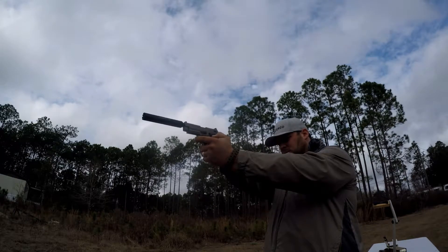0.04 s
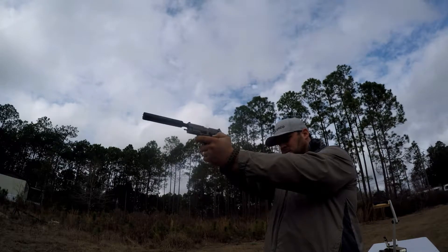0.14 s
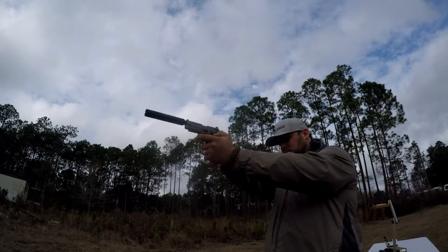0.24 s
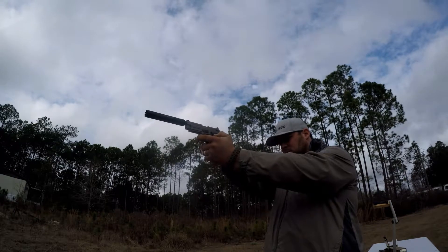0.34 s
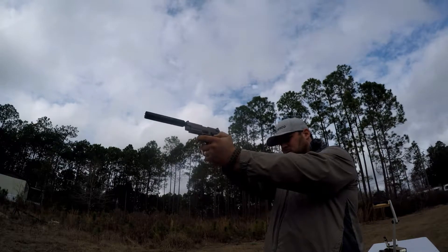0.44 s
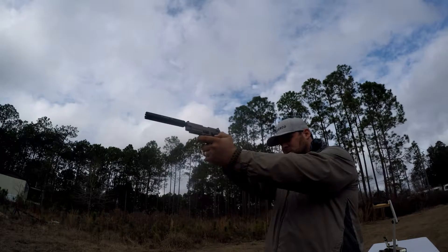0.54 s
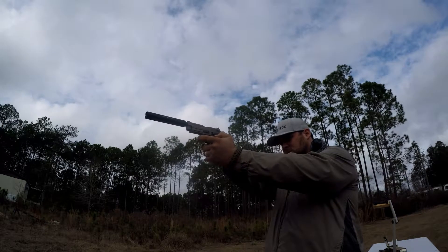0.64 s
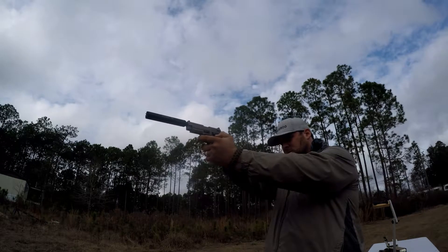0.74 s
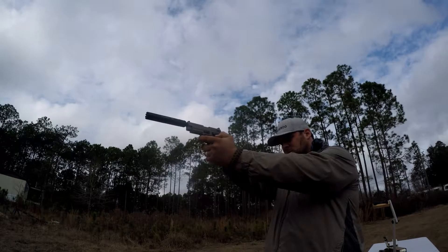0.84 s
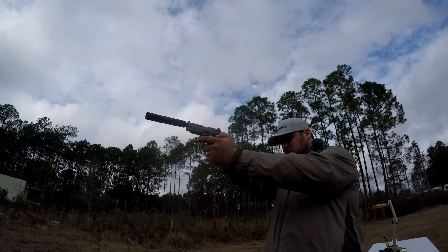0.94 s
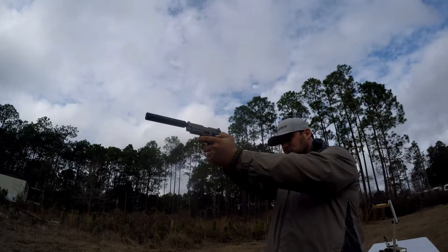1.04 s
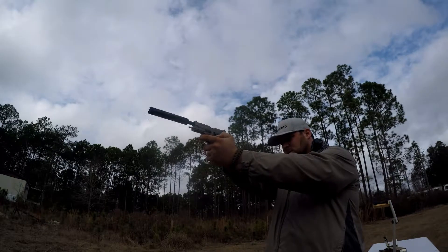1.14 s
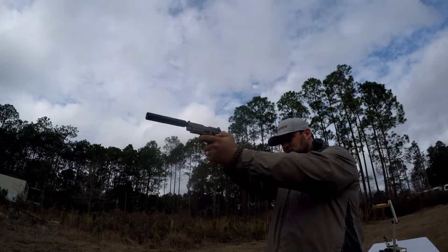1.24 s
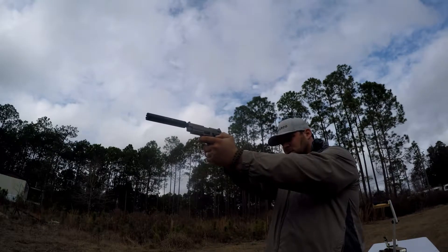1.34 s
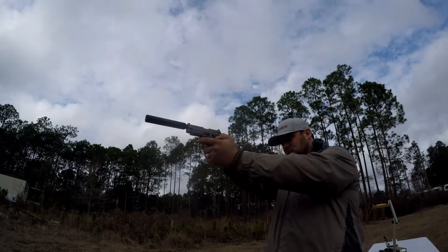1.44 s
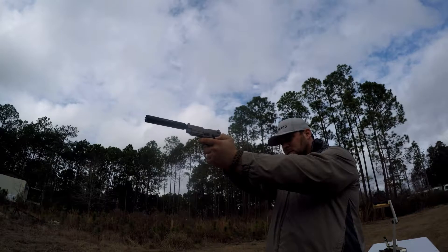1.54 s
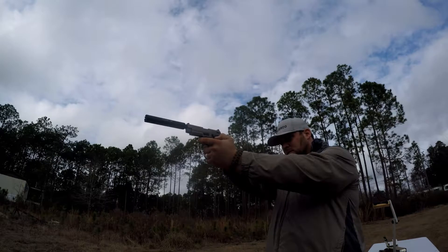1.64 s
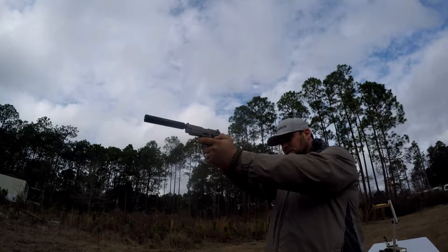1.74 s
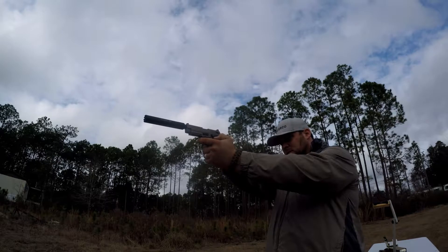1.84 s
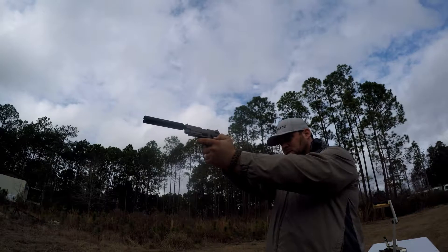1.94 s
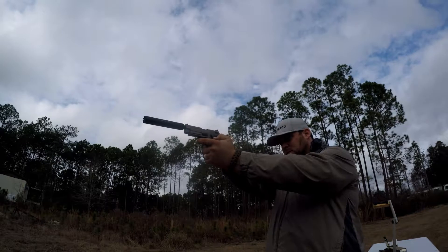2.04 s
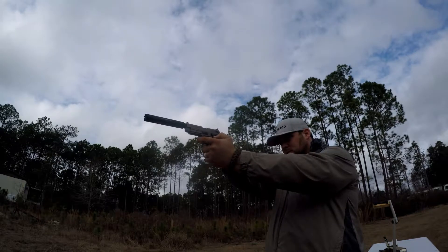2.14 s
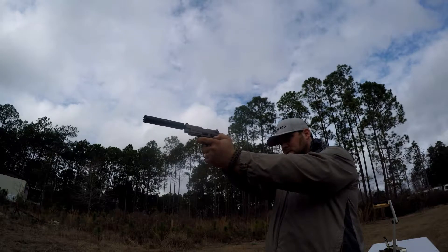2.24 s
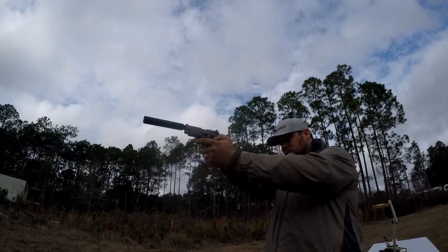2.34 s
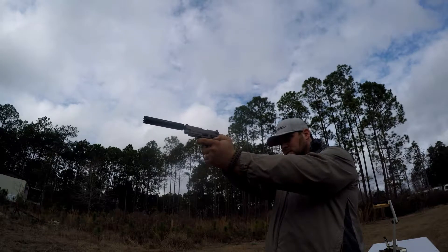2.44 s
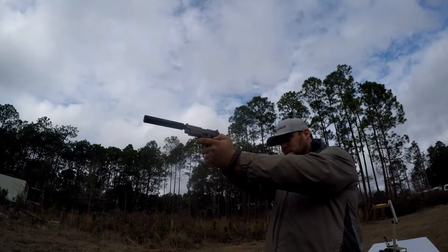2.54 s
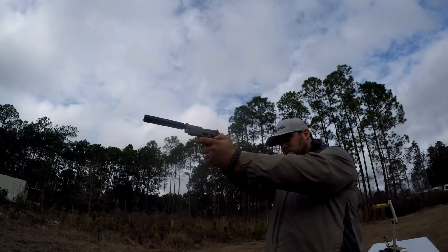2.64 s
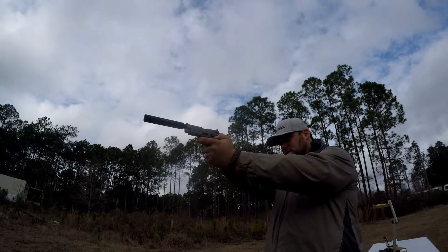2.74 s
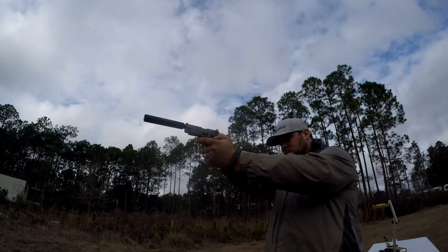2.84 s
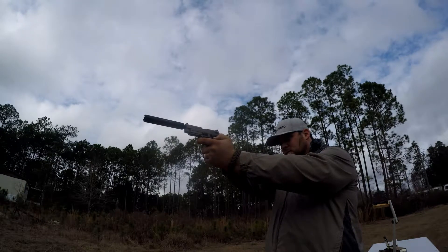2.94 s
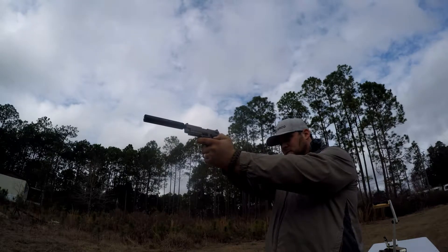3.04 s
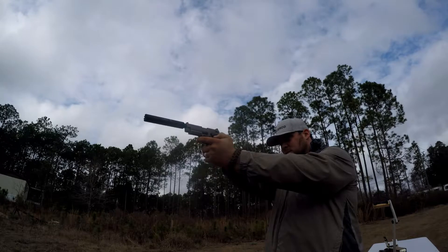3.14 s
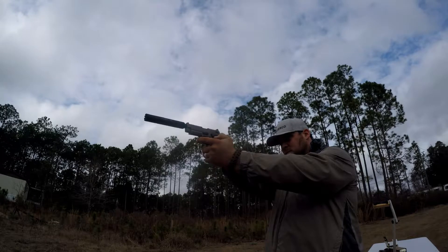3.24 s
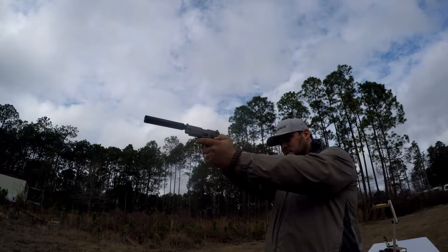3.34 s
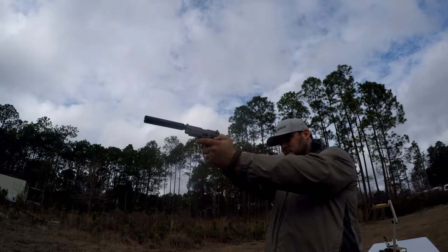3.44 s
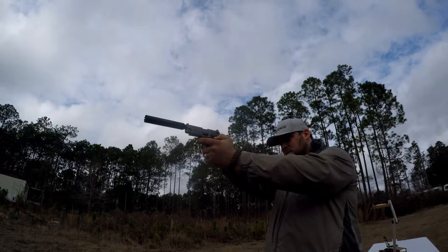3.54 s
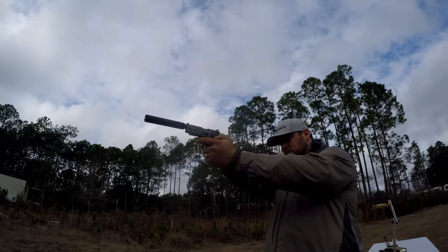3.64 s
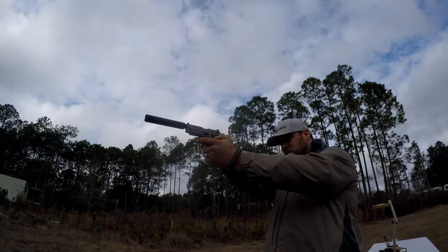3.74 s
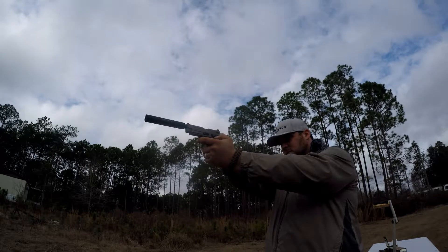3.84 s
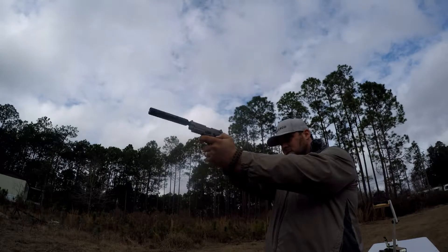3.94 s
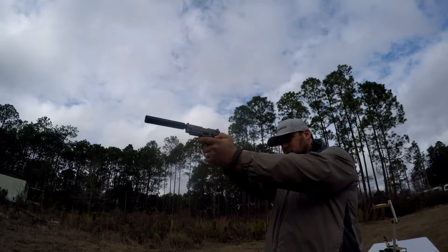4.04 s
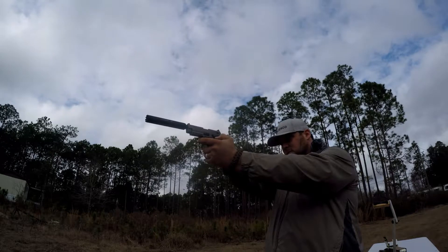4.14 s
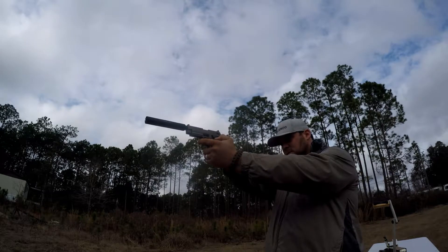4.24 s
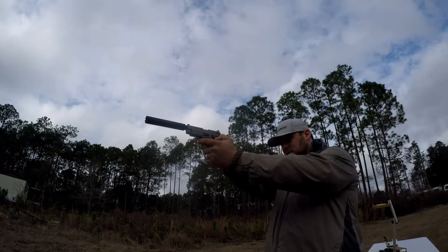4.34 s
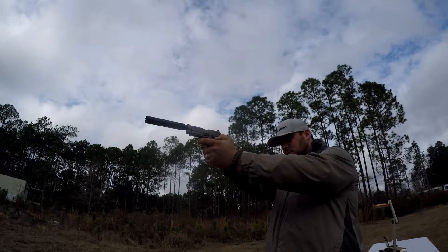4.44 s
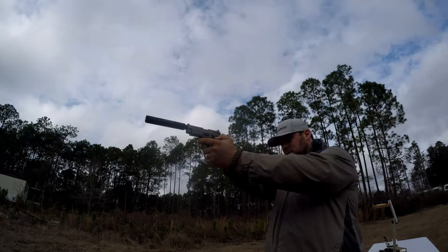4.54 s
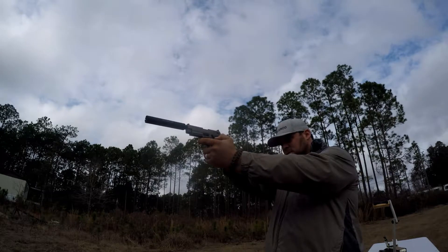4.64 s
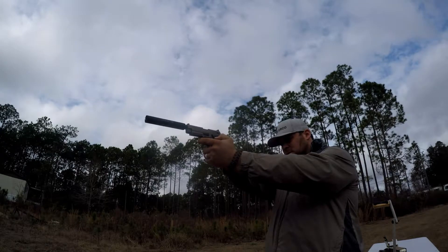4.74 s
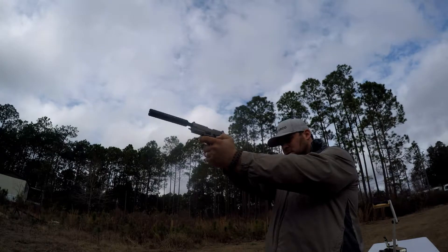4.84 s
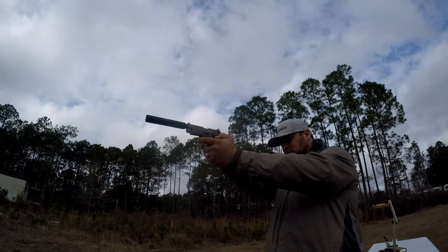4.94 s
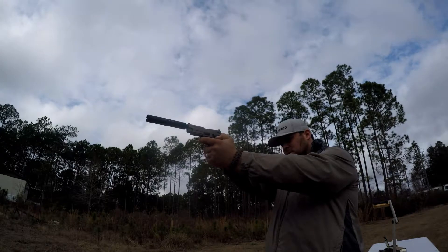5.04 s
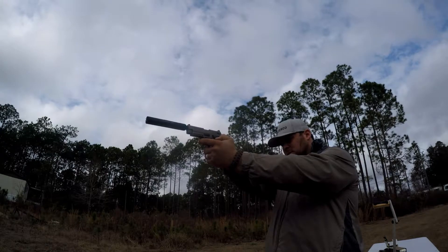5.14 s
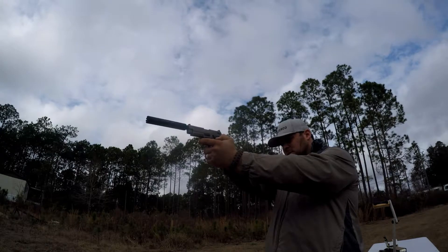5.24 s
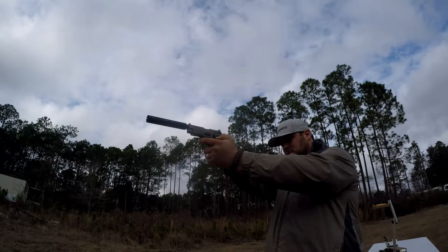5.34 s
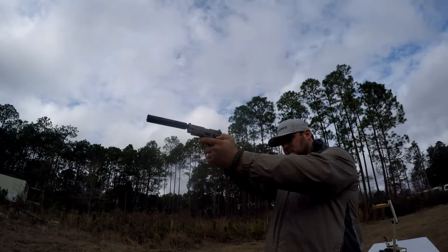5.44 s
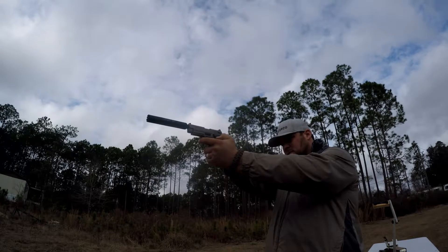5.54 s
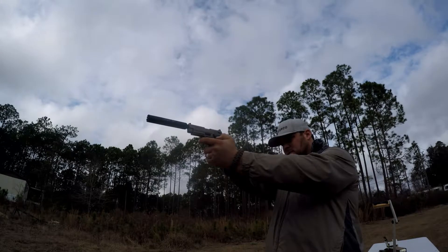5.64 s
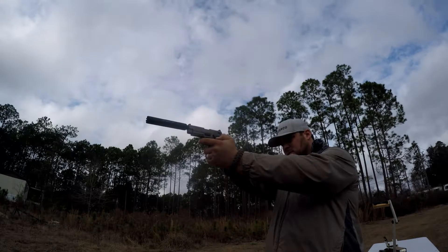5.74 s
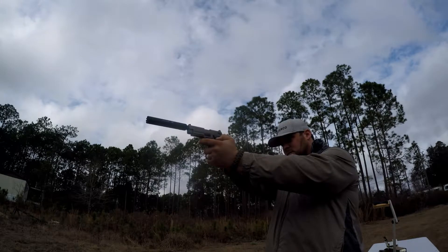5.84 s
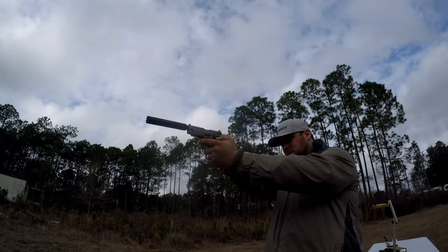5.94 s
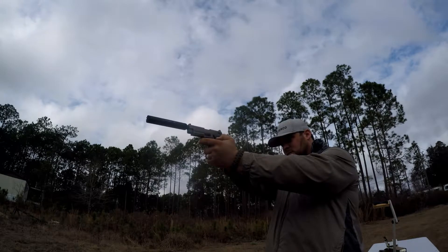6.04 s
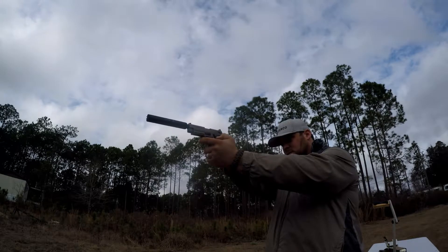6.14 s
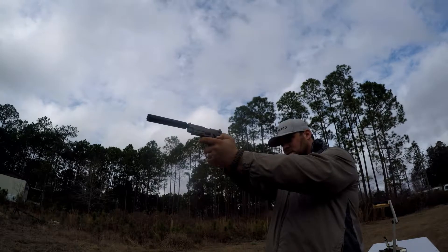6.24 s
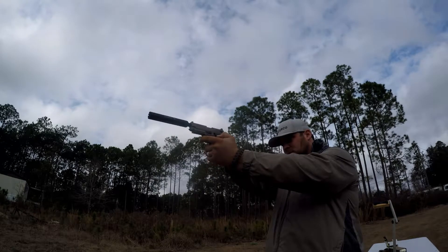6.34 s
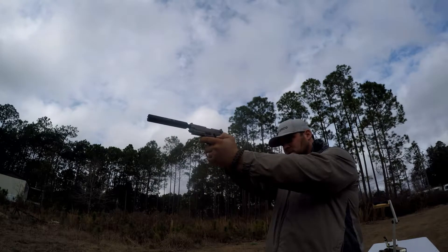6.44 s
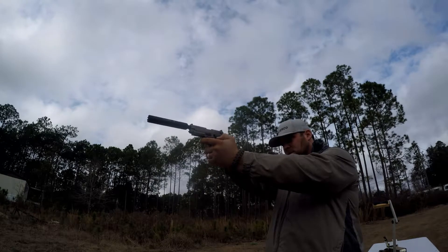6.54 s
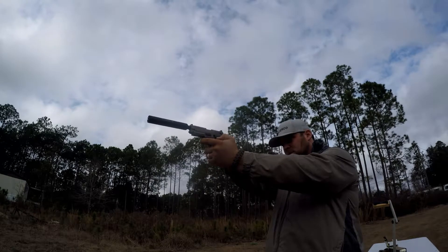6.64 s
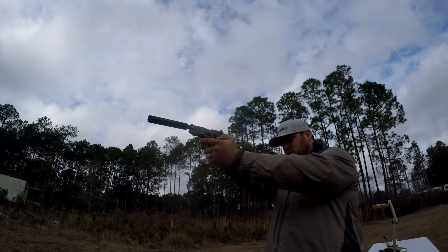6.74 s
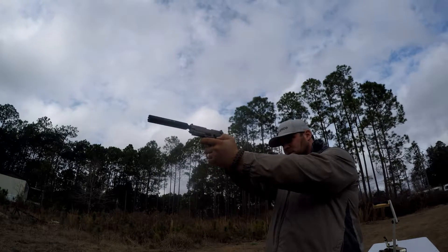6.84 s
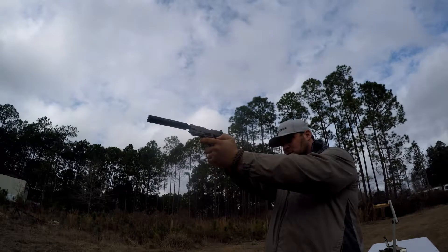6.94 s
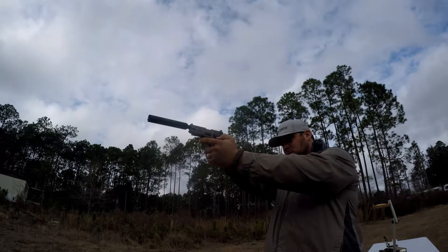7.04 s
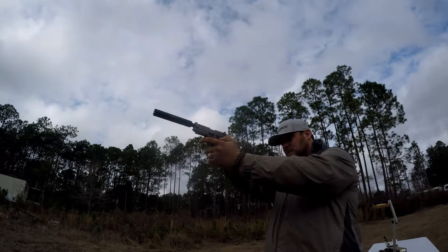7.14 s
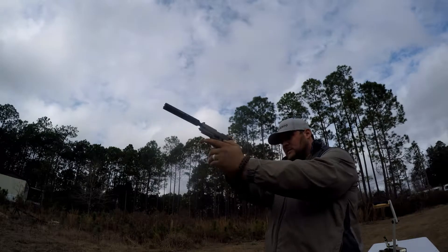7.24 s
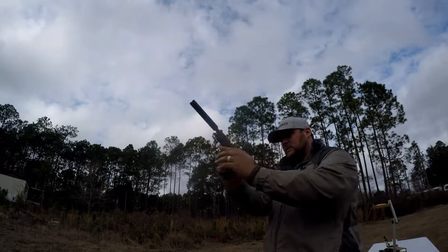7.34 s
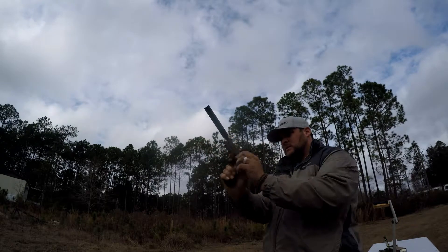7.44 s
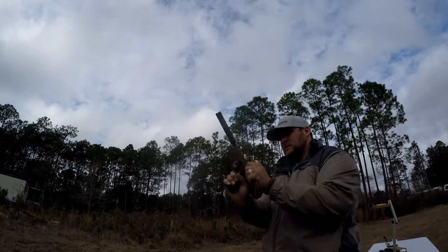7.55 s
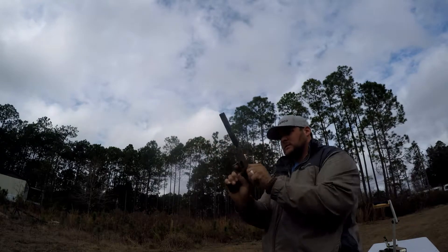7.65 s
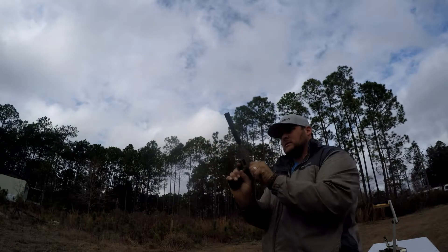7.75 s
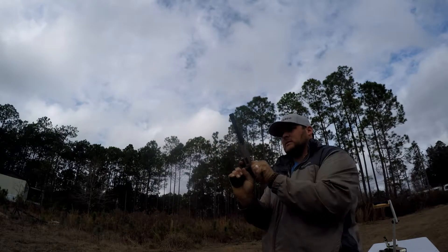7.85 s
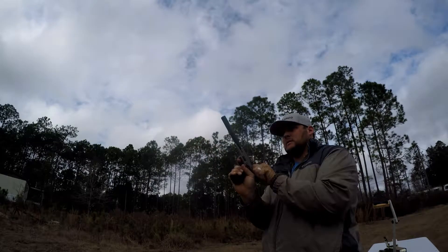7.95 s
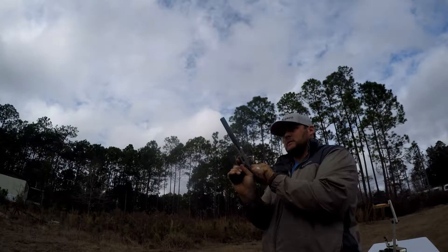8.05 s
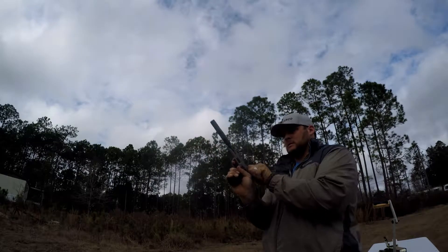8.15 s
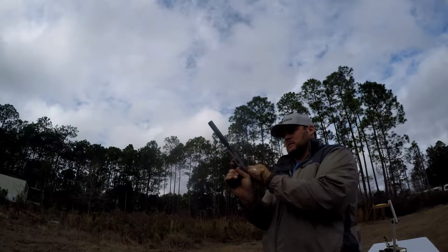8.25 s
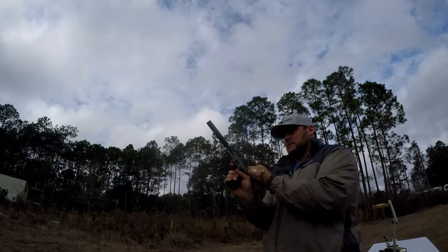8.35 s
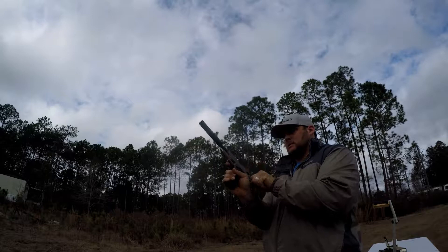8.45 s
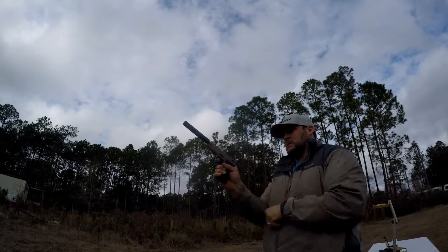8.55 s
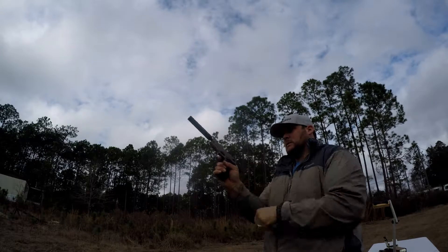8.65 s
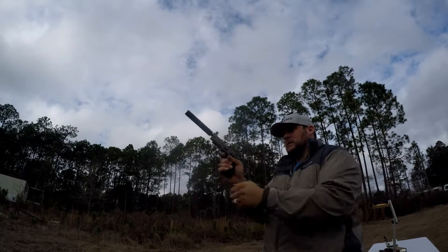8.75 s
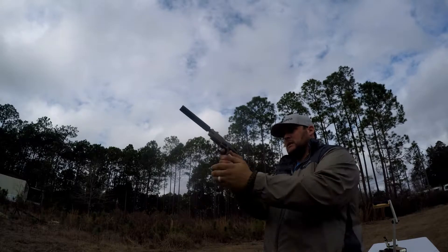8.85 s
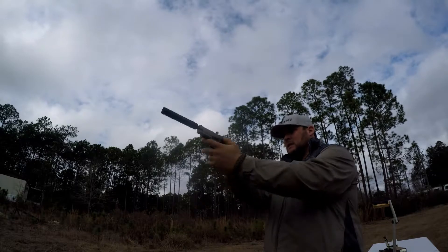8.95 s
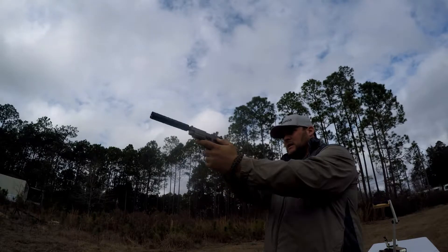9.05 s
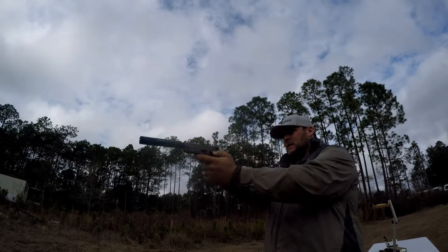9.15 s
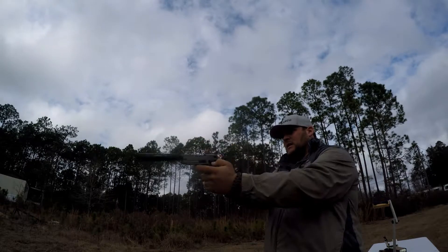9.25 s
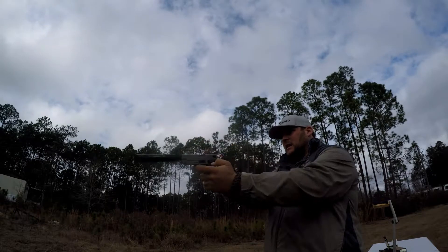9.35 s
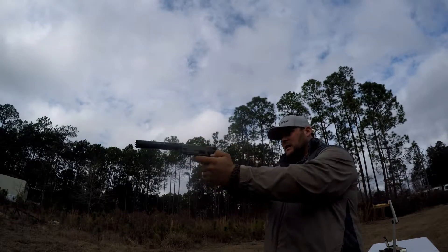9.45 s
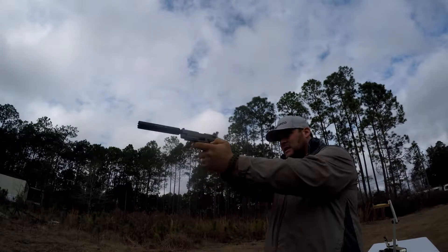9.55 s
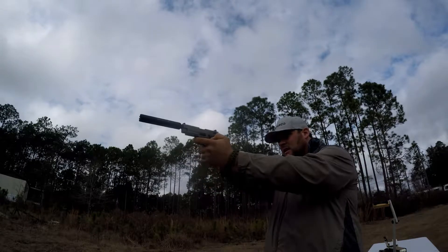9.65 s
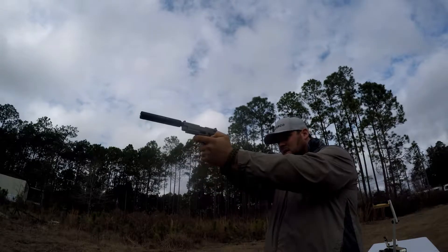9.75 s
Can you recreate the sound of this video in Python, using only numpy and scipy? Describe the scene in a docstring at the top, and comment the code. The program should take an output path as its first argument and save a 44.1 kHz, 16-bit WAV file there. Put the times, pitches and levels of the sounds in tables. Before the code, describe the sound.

Wind rumbles softly on the microphone in an open range beside pines. A suppressed pistol fires seven times, slightly unevenly spaced: blunt, overloading pop, gas hiss, bright steel clatter, then slapping reflections and fading leafy rush. A far bird calls faintly between the first shots and a thin peep comes later. Finally the action is pulled back with a scrape and click, then slammed home, leaving wind.

```python
"""Suppressed pistol at the edge of a pine wood

A small suppressed pistol fires seven times close by; then its bolt is worked by hand.
Each shot sums damped sines (the thump), coloured noise (the gas) and struck modes (the bolt).
Trunks and crowns answer with delayed, fading noise; the loudest peaks overload the input.
Shaped noise gives wind on the microphone, far rush and drone, needles and input hiss.
Gliding sines make a small bird's two peeps; harmonics make the short calls of another far off.
"""
import sys
import numpy as np
from scipy import signal
from scipy.fft import rfft, irfft, next_fast_len
from scipy.io import wavfile
from scipy.ndimage import map_coordinates

SR = 44100
rng = np.random.default_rng(int(sys.argv[2]) if len(sys.argv) > 2 else 0)


def pcm_store(signal):
    """Save signal as 16-bit PCM."""
    levels = np.round(np.clip(np.atleast_2d(signal), -1, 1) * 32767)
    wavfile.write(sys.argv[1], SR, levels.astype(np.int16).T)


N = 431738

# Levels of layers are relative to the steps that use them.
# Wind buffeting: t/s, level/dB
BUFFET_LEVEL = [(0, -45.5), (2, -45), (4.7, -43), (6, -44), (7.5, -47), (8.4, -44.5), (9.1, -46),
                (9.79, -47)]
# Spectrum of the buffeting: f/Hz, level/dB
BUFFET_SPECTRUM = [(15, -3.5), (30, -2), (50, 1.5), (70, -7.5), (100, -17), (160, -37.5)]
# Single thumps of wind: centre t/s, level/dB
GUSTS = [(1.76, -48), (1.91, -46), (3.868, -40.5), (7.23, -47), (7.41, -48), (8.871, -41), (8.98, -64),
         (9.32, -42), (9.67, -35.5), (9.79, -49)]
GUST_WIDTH_S = 0.053  # half width
LULL_DB, LULL_DEEPEST_S = -8.5, .22  # the buffeting dips after each shot and creeps back
# Far rush of air: t/s, level/dB
RUSH_LEVEL = [(0, -57.5), (2.5, -55), (5, -56.5), (6, -54), (9.8, -54)]
# Spectrum of the far rush: f/Hz, level/dB
RUSH_SPECTRUM = [(65, -36), (110, -0.5), (181, -11), (215, -11), (275, -15.5), (395, -14), (1050, -25.5),
                 (1290, -31.5), (1400, -36), (1820, -66), (3080, -120)]
# Spectrum of the steady far drone: f/Hz, level/dB
DRONE_SPECTRUM = [(25, -11.5), (45, -4.5), (70, -4), (97, 1.5), (125, -12), (170, -23.5)]
# Spectrum of needles and input hiss: f/Hz, level/dB
NEEDLE_SPECTRUM = [(710, -35), (1200, -6.5), (1650, -1), (1780, -5), (1940, -2), (14100, -20.5),
                   (15500, -24), (16400, -49.5)]

# Shots: hammer t/s, gas hiss level/dB; the wood's answer near 2 kHz, near 4 kHz and above 5 kHz level/dB,
# its narrow band f/Hz and level/dB; bolt stop f/Hz and treble level/dB; bolt return t/s after the hammer,
# its level/dB, f/Hz and frame ring level/dB; seating thud level/dB
SHOTS = [(0.2088, 0.044, -7.5, 3, -0.77, 4150, -2.5, 4120, 0, .0449, -1.5, 2410, 3.5, -23),
         (1.182, 0.63, 0.5, 2, 0.4, 5200, -6, 5600, 4.5, 0.045, -0.5, 2620, 5, -22),
         (2.12, 1, -7.5, 3.5, 0, 4150, -2, 5760, 5, 0.046, 0.5, 3034, 3, -20.5),
         (3.1018, 0.76, -0.5, 1.5, 0.99, 5350, -1.5, 5600, -3, 0.044, 2, 2305, 1, -22.5),
         (3.9706, 0.47, 0, 2, -0.4, 4000, -5.5, 5490, -0.5, .0462, 3, 2650, -2, -16),
         (4.8594, 0.4, -1.5, -2, 0, 7850, -8, 7800, 7, .0447, 1.5, 2600, 3.5, -19.5),
         (6.315, 0.58, -3.5, 4, 1, 4100, -14, 5760, -2.5, 0.047, -4, 2560, -4, -18)]
# Thump stages (charge lights, tube rings, suction, slow swing back of the air):
# t/s after the hammer, f/Hz, t60/s, pressure (1 overloads the input)
THUMP_STAGES = [(.0021, 600, .025, .37), (.00387, 315, .015, 4.2), (.00661, 153, .0115, -2.7),
                (.00846, 33.2, .1, .326)]
# Puffs from muzzle, opening breech and last leak: t/s after the hammer, level/dB, rise constant/s, t60/s
GAS_PUFFS = [(.0018, -3.5, .001, .022), (.009, -13, .0015, 0.036), (.012, -36, .005, .24)]
# Spectrum of the gas: f/Hz, density level/dB
GAS_SPECTRUM = [(710, -45), (1200, -12.5), (1580, -14), (3010, -4.5), (4770, -8.5), (5800, 2.5),
                (6620, -10), (7800, -8), (8800, -15.5), (14600, -11), (16400, -33.5)]
# Spectrum of the thump scattered by ground and table: f/Hz, level/dB
NEAR_SPECTRUM = [(150, -9.5), (300, 1.5), (500, -4), (900, -9.5), (1400, -16)]

# Ringing modes of the steel, the frame first: f/Hz, level/dB, t60/s
STEEL_MODES = [(2028, -12, .09), (2100, -1, .025), (2600, 1, .025), (3150, -1, .025), (3900, -4, .025),
               (4650, -2, .02), (5750, 0, .025), (7790, -2, .03), (9500, -8, .02), (12700, -8, .025)]
# Spectrum of the body of a contact: f/Hz, level/dB
KNOCK_SPECTRUM = [(300, -30.5), (500, -20), (900, -10.5), (1400, -8.5), (1900, -3), (2600, 1), (3400, -1.5),
                  (4800, -2.5), (6500, -8), (7500, -17)]
# Spectrum of the treble of a contact: f/Hz, level/dB
SNAP_SPECTRUM = [(5000, -25.5), (8000, -0.5), (13000, -0.5), (15300, -2.5)]
# Contacts as the bolt flies back: t/s after the hammer, level/dB, treble level/dB,
# frame ring level/dB, struck f/Hz
BOLT_BACK = [(.0014, -10.5, -5.5, -7.5, 5900), (.0074, -20.5, -12.5, -7.5, 5624)]
STOP_S, STOP_DB, STOP_FRAME_DB = 0.0068, -19.5, -8  # bolt stop: after the hammer, level, frame ring
# Contacts as it comes home: t/s after its return, level/dB, treble level/dB, frame ring level/dB,
# struck f as a share of the return's
BOLT_HOME = [(0, -22.5, -17.5, -6.5, 1), (.003, -21.5, -20.5, -9.5, .95), (.0105, -25.5, -9, -6, .8)]
# Bolt, catch and magazine worked by hand: t/s, level/dB, treble level/dB, frame ring level/dB, struck f/Hz
HANDLING = [(7.086, -57, -17, -8, 2800), (7.29, -57, -23.5, -9.5, 2300), (7.556, -48, -21, -12.5, 4700),
            (7.573, -48, -19, -10, 4000), (7.945, -45, -25, 2, 2000), (7.97, -26, -19, -6, 4430),
            (7.99, -29, -25, -22, 2600), (7.995, -26, -14, -25, 3450), (8.044, -51, -2, -12, 2000),
            (8.471, -48, -22.5, -7, 1900), (8.502, -36, -14, -18.5, 4840), (8.519, -24.5, -14.5, -12, 3470),
            (8.527, -28, -14, -11, 4600), (8.5354, -12, -17, 0, 1900), (8.585, -37.5, -9.5, 0, 1980),
            (8.834, -44.5, -16.5, -5, 4900)]
SEAT_S, SEAT_HZ = .058, 294  # thud of the seating bolt: after the hammer, pitch
# Thuds of the handling: t/s, level/dB, f/Hz
HANDLING_THUDS = [(7.995, -45, 450), (8.537, -41, 440)]

# Spectra of the wood's answer in four bands: f/Hz, level/dB
ANSWER_BANDS = [
    [(1000, -22.5), (1500, -7.5), (2200, 2), (2800, -4.5), (3500, -14)],
    [(2900, -16.5), (3600, -5.5), (4150, -1.5), (4600, -9.5), (5300, -17)],
    [(4200, -15), (5000, 2), (5600, -1), (6800, -6), (7800, -7), (9000, -20)],
    [(7500, -15), (9000, 2.5), (11500, -7.5), (13000, -4), (15300, -9)],
]
MIDDLE_DB, MIDDLE_LOSS = -54.5, 18  # level at the shot, decay in dB/s
TREBLE_DB, TREBLE_LOSS = -53, 37
WASH_S, WASH_RISE_S = 0.06, .015  # delay of the wash, its rise constant
BAND_STEP = 0.032  # spacing of the narrow band's points, as a share of its pitch
# Denser stands of trees: centre t/s after the shot, half width/s, middle level/dB, treble level/dB
STANDS = [(.107, 0.019, -53, -48), (0.182, 0.019, -61, -54), (.275, 0.025, -55.5, -60.5),
          (.38, 0.013, -56, -78), (.62, .2, -67, -84)]
# Single near trunks and walls: t/s after the shot, level/dB, f/Hz
TRUNKS = [(.108, -39, 1843), (.136, -62, 2420), (.155, -46.5, 2500), (.1805, -37, 2280), (0.22, -50, 2870),
          (0.244, -39.5, 2460), (0.301, -50.5, 2014), (0.346, -52, 2170), (0.371, -49, 2100),
          (0.441, -58, 2220), (.555, -60.5, 2230), (.637, -53, 2220)]

# Calls of a far bird: t/s, length/s, top f/Hz, level/dB
CHUCKS = [(.775, 0.026, 885, -68), (0.93, .028, 925, -62), (1.107, .03, 930, -60)]
CHUCK_DROOP = .13  # share of the top pitch lost at both ends
# Peeps of a small bird: t/s, length/s, from f/Hz, to f/Hz, level/dB
PEEPS = [(2.72, 0.082, 8650, 8580, -77), (7.01, .09, 8500, 8600, -76.5)]
# Steel sliding on steel: full from t/s, held/s, level/dB
STROKES = [(7.945, .025, -55), (8.51, 0.033, -50)]
STROKE_RISE, STROKE_FALL = 700, 630  # dB/s
SETTLE_DB, SETTLE_FALL = -6.5, 42  # loose parts: level below the slide, decay in dB/s
# Spectrum of the slide: f/Hz, level/dB
SLIDE_SPECTRUM = [(500, -16), (1200, -7), (2200, -1.5), (3600, 2), (4800, 2.5), (6500, -9.5), (15000, -21)]
TOP_HZ = 16575  # end of the passband


def amp(db):
    """Amplitude ratio: level is logarithmic, twenty dB to a factor of ten."""
    return 10 ** (np.asarray(db) / 20)


def unit(x):
    """Normalisation: division by the root mean square."""
    return x / np.sqrt(np.mean(x ** 2) + 1e-20)


def clock(seconds):
    """Sampling: instants 1/SR apart, starting at zero."""
    return np.arange(round(seconds * SR)) / SR


def add(track, s, sound):
    """Superposition: pressures add from time s on."""
    part = track[round(s * SR):][:len(sound)]
    part += sound[:len(part)]


def noise(spectrum, size):
    """Spectral shaping: white noise filtered to f/Hz, level/dB points, steep beyond them, rms 1."""
    f, db = np.transpose(spectrum)
    m = next_fast_len(size)
    hz = np.fft.rfftfreq(m, 1 / SR) + 1
    gain = amp(np.interp(np.log(hz), np.log(f), db, left=-120, right=-120))
    white = rng.standard_normal(m)
    return unit(irfft(rfft(white) * gain, m)[:size])


def ring(t, hz, t60):
    """Damped oscillation: a sine from t = 0 falls 60 dB in t60."""
    t = np.maximum(t, 0)
    return np.sin(2 * np.pi * hz * t) * amp(-60 * t / t60)


def rise(t, constant):
    """Exponential approach: zero until t = 0, then towards one."""
    return 1 - np.exp(-np.maximum(t, 0) / constant)


def wobble(rate, size):
    """Random modulation: a smooth curve through rate random knots a second."""
    knots = rng.standard_normal(size // 16)
    return map_coordinates(knots, [np.arange(size) * rate / SR])


def level(rows, t):
    """Envelope: gain interpolated linearly in dB between t/s, level/dB rows."""
    rows = np.array(rows)
    return amp(np.interp(t, rows[:, 0], rows[:, 1], left=-120, right=-120))


def swell(t, width, edge=2.5):
    """Rounded pulse about t = 0: a higher edge exponent flattens its top."""
    return np.exp(-.5 * np.abs(t / width) ** edge)


def wind():
    """Turbulence at the microphone: low noise with lumpy strength, plus single gusts."""
    t = np.arange(N) / SR
    after = np.maximum(t - np.array(SHOTS)[:, :1], 0) / LULL_DEEPEST_S
    lull_db = LULL_DB * (after * np.exp(1 - after)).sum(axis=0)
    strength = level(BUFFET_LEVEL, t) * amp(lull_db + 2.5 * wobble(9, N))
    strength += sum(amp(db) * swell(t - s, GUST_WIDTH_S) for s, db in GUSTS)
    return strength * unit(amp(1.6 * wobble(12, N)) * noise(BUFFET_SPECTRUM, N))


def far_air():
    """Diffuse sound: many far sources blend into bands of noise with slight level drift."""
    t = np.arange(N) / SR
    drift_db = 0.51 * wobble(3.3, N) + 0.68 * wobble(16, N)
    rush = level(RUSH_LEVEL, t) * amp(drift_db) * noise(RUSH_SPECTRUM, N)
    drone = amp(-53.5 + 2.5 * wobble(5.4, N)) * noise(DRONE_SPECTRUM, N)
    needles = amp(-65.5 + 0.7 * wobble(0.83, N)) * noise(NEEDLE_SPECTRUM, N)
    return rush + drone + needles


def shots():
    """Impulsive gas flow: damped pressure swings make the thump, turbulent puffs the spitting hiss."""
    out, t = np.zeros(N), clock(.2)
    thump = sum(pressure * ring(t - s, hz, t60) for s, hz, t60, pressure in THUMP_STAGES)
    thump += amp(-30.5) * ring(t - .052, 410, 0.079)  # a wall nearby returns the ring of the tube
    puffs = sum(amp(db - 60 * (t - s) / t60) * rise(t - s, rise_s)
                for s, db, rise_s, t60 in GAS_PUFFS)
    scatter = amp(-33 - 60 * t / 0.1) * rise(t, .004)
    for s, hiss_db, *_ in SHOTS:
        add(out, s + .01, scatter * noise(NEAR_SPECTRUM, len(t)))
        spit = amp(4.5 * wobble(700, len(t)))
        hiss = amp(hiss_db) * puffs * spit * noise(GAS_SPECTRUM, len(t))
        add(out, s, thump * amp(rng.normal(0, 0.23)) + hiss)
    return out


def contacts():
    """Sequence of impacts: one bolt cycle for each shot, then the handling."""
    rows = []
    for s, *_, stop_hz, stop_treble_db, home_s, home_db, home_hz, home_frame_db, _ in SHOTS:
        rows += [(s + lag, *rest) for lag, *rest in BOLT_BACK]
        rows.append((s + STOP_S, STOP_DB, stop_treble_db, STOP_FRAME_DB, stop_hz))
        rows += [(s + home_s + lag, db + home_db, treble_db, frame_db + home_frame_db, share * home_hz)
                 for lag, db, treble_db, frame_db, share in BOLT_HOME]
    return rows + HANDLING


def clatter_and_ring():
    """Modal excitation: each contact gives a noisy clatter and sets the steel's modes ringing."""
    out, t = np.zeros(N), clock(.15)
    hz, mode_db, t60 = np.transpose(STEEL_MODES)[:, :, None]
    attack = rise(t, .0005)
    dying = amp(-60 * t / 0.014) + .5 * amp(-60 * t / 0.038)  # the blow, then loose parts rattling
    for s, db, treble_db, frame_db, struck_hz in contacts():
        clatter = noise(KNOCK_SPECTRUM, len(t)) + amp(treble_db) * noise(SNAP_SPECTRUM, len(t))
        clatter *= dying * amp(2 * wobble(610, len(t)))
        clatter *= amp(-7 * (db < -44))  # light touches hardly rattle
        level_chance, pitch_chance = rng.standard_normal((2, len(STEEL_MODES), 1))
        struck_db = mode_db + 2 * level_chance
        struck_db += 0.72 * treble_db * (hz > 7000)  # sharp blows reach the high modes
        # the part that is hit rings most
        struck_db -= np.minimum(30 * np.abs(np.log2(hz / struck_hz)), 14)
        struck_db[0] = mode_db[0] + frame_db
        modes = amp(struck_db) * ring(t, hz * (1 + 0.0031 * pitch_chance), t60)
        add(out, s, amp(db) * attack * (clatter + amp(3.5) * modes.sum(axis=0)))
    return out


def thud(t, hz):
    """Heavily damped oscillation with a softened onset."""
    return ring(t, hz, 0.011) * rise(t, 0.0021)


def thuds():
    """Momentum transfer: the seating bolt and the handling thud, each reflected once by the ground."""
    out, t = np.zeros(N), clock(.15)
    seatings = [(row[0] + SEAT_S, row[-1], SEAT_HZ) for row in SHOTS]
    for s, db, hz in seatings + HANDLING_THUDS:
        both = thud(t, hz) + amp(-10) * thud(t - .0048, hz)
        add(out, s, -amp(db + 15) * both)
    return out


def wash_envelope(t, db, loss, stand_column):
    """Multiple scattering: a delayed onset decays in dB/s, and denser stands swell it."""
    wash = rise(t - WASH_S, WASH_RISE_S) * amp(db - loss * t)
    stands = sum(amp(row[stand_column]) * swell(t - row[0], row[1], edge=2.85) for row in STANDS)
    return wash + stands


def crowns():
    """Diffuse reverberation: crowns scatter each shot into a rush whose treble dies first."""
    out, t = np.zeros(N), clock(1.5)
    middle = wash_envelope(t, MIDDLE_DB, MIDDLE_LOSS, 2)
    treble = wash_envelope(t, TREBLE_DB, TREBLE_LOSS, 3)
    between = np.sqrt(middle * treble)
    for s, _, mid_db, upper_db, treble_db, band_hz, band_db, *_ in SHOTS:
        grain = amp(2.3 * wobble(150, len(t)))  # many separate trunks
        rush = amp(mid_db) * middle * noise(ANSWER_BANDS[0], len(t))
        rush += amp(upper_db - 3 - 4 * t) * between * noise(ANSWER_BANDS[1], len(t))
        rush += amp(treble_db) * treble * noise(ANSWER_BANDS[2], len(t))
        # air swallows the top on long paths
        rush += amp(treble_db - 7.5 - 27 * t) * treble * noise(ANSWER_BANDS[3], len(t))
        band = [(band_hz * (1 + k * BAND_STEP), -7 * abs(k)) for k in range(-3, 4)]
        rush += amp(band_db - 14 * t) * between * noise(band, len(t))
        add(out, s, grain * rush)
    return out


def trunks():
    """Discrete reflection: near trunks and walls return short coloured smacks."""
    out, t = np.zeros(N), clock(.04)
    envelope = amp(-60 * t / .032) * rise(t, .0006)
    for s, _, mid_db, *_ in SHOTS:
        for lag, db, hz in TRUNKS:
            colour = [(hz / 2, -20), (hz * 0.83, -3), (hz, 0), (hz * 1.35, -7), (hz * 2.2, -24)]
            smack = noise(colour, len(t)) * envelope
            add(out, s + lag, amp(db + mid_db + 3.0 + rng.normal(0, 1)) * smack)
    return out


def far_bird():
    """Harmonic tone: the pitch of each call arches, and only the second and third harmonics carry."""
    out = np.zeros(N)
    for s, length, top_hz, db in CHUCKS:
        u = np.linspace(-1, 1, round(length * SR))
        phase = 2 * np.pi * np.cumsum(top_hz * (1 - CHUCK_DROOP * u ** 2)) / SR
        tone = np.sin(2 * phase) + amp(-2) * np.sin(3 * phase)
        add(out, s, amp(db) * np.sqrt(np.abs(1 - u ** 2)) * tone)
    return out


def peeps():
    """Frequency glide: a thin sine slides from one pitch to another under a rounded envelope."""
    out = np.zeros(N)
    for s, length, from_hz, to_hz, db in PEEPS:
        u = np.linspace(0, 1, round(length * SR))
        phase = 2 * np.pi * np.cumsum(from_hz + (to_hz - from_hz) * u) / SR
        envelope = np.abs(np.sin(np.pi * u)) ** .5
        add(out, s, amp(db) * envelope * np.sin(phase))
    return out


def strokes():
    """Sliding friction: rough noise swells steeply, holds and stops, and loose parts settle."""
    t = np.arange(N) / SR
    strength = np.zeros(N)
    for s, held, db in STROKES:
        after = np.maximum(t - s - held, 0)
        fall = amp(-STROKE_FALL * after) + amp(SETTLE_DB - SETTLE_FALL * after)
        strength += amp(db - STROKE_RISE * np.maximum(s - t, 0)) * fall
    return strength * amp(2.7 * wobble(230, N)) * noise(SLIDE_SPECTRUM, N)


def scene():
    """Superposition of all sources in one channel."""
    air = wind() + far_air()
    pistol = shots() + clatter_and_ring() + thuds() + strokes()
    wood = crowns() + trunks()
    birds = far_bird() + peeps()
    return (air + pistol + wood + birds)[None]


def record(dry):
    """Nonlinear input: overloads lower the gain with a lag, peaks clip softly, the band is limited."""
    t = clock(1.8)
    memory = np.exp(-t / 0.52) * rise(t, 0.066)  # the gain sinks a moment later and creeps back
    overloads = 1. * (abs(dry[0]) > 1)
    load = signal.fftconvolve(overloads, memory)[:N] / (0.0051 * SR)
    x = dry * amp(-4.5 * np.tanh(np.abs(load)))
    x = x / (1 + np.abs(x / .95) ** 9) ** (1 / 9)
    m = next_fast_len(N + 4096)
    hz = np.fft.rfftfreq(m, 1 / SR)
    shelf = amp(-22 * np.clip((hz - 15100) / 400, 0, 1))  # little passes above 15 kHz
    return irfft(rfft(x, m) * shelf * (hz < TOP_HZ), m)[:, :N]


dry = scene()
out = record(dry)
pcm_store(out)
```